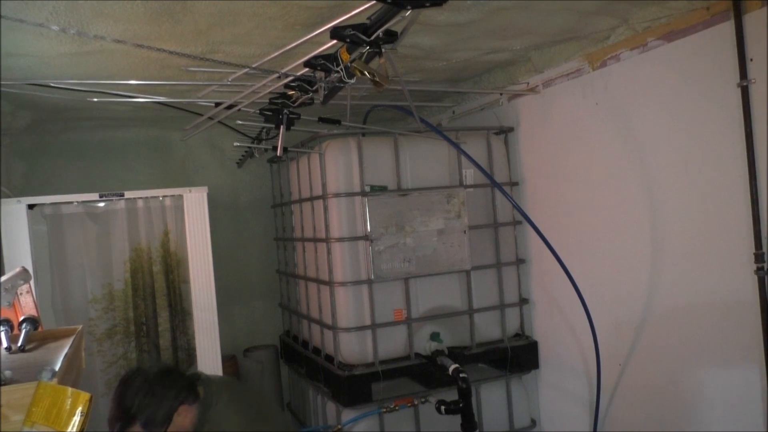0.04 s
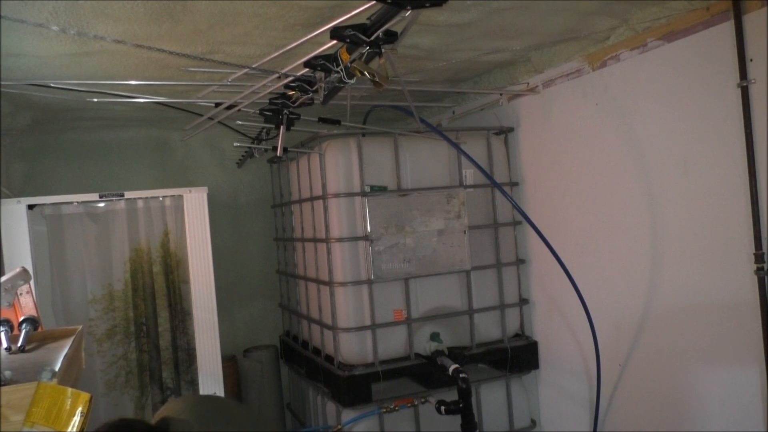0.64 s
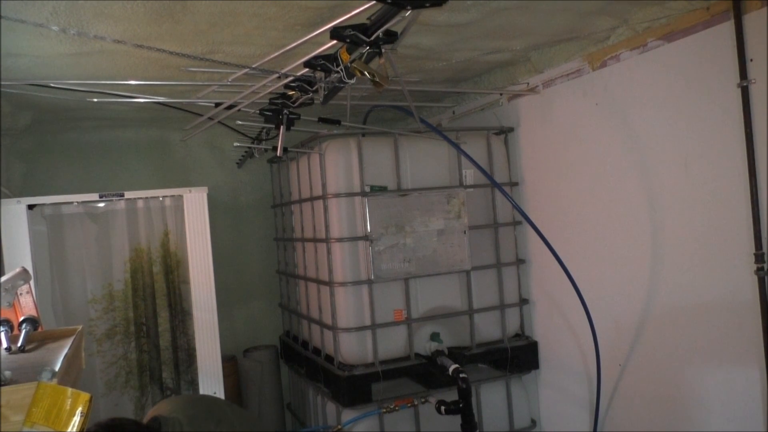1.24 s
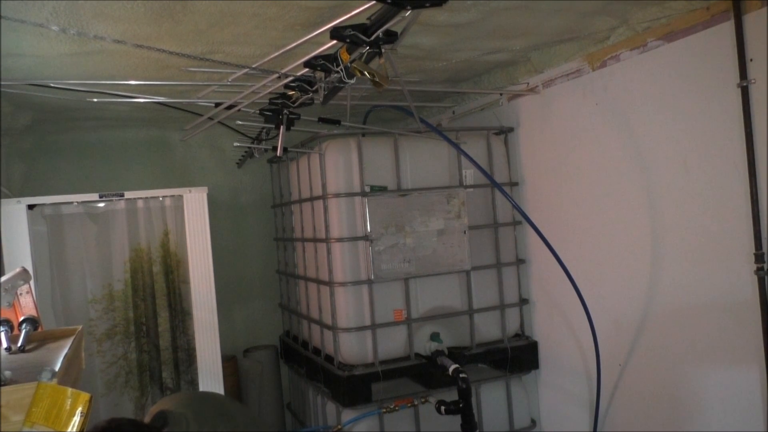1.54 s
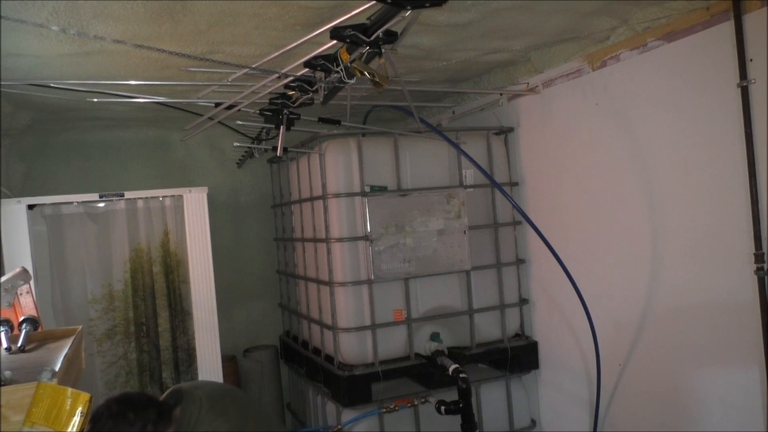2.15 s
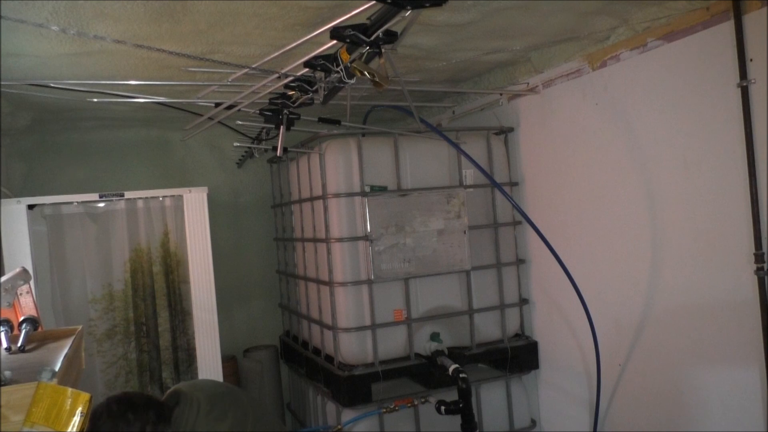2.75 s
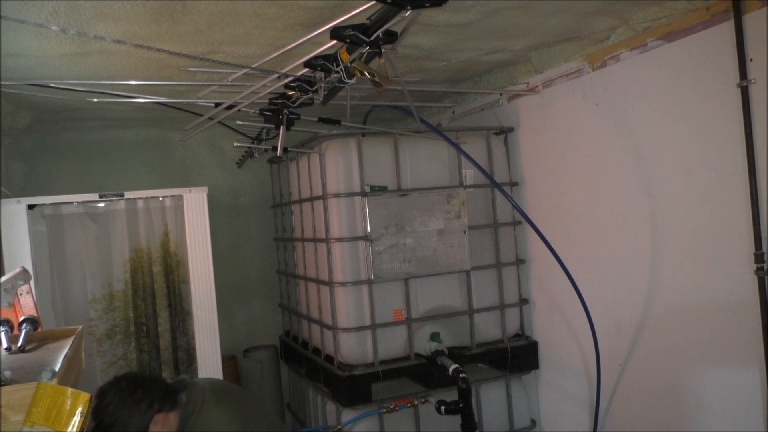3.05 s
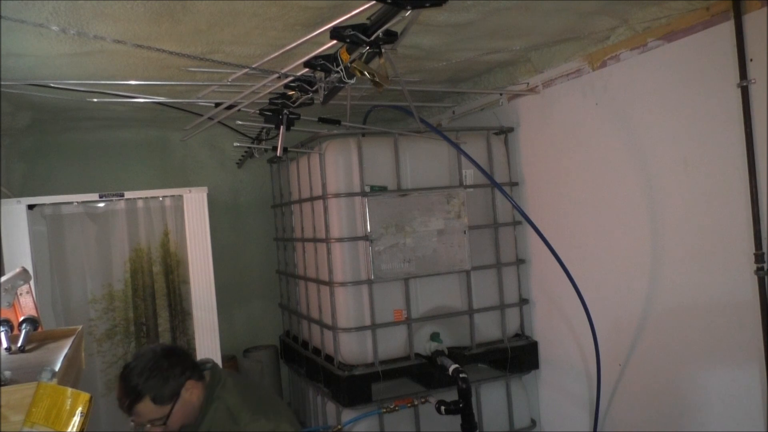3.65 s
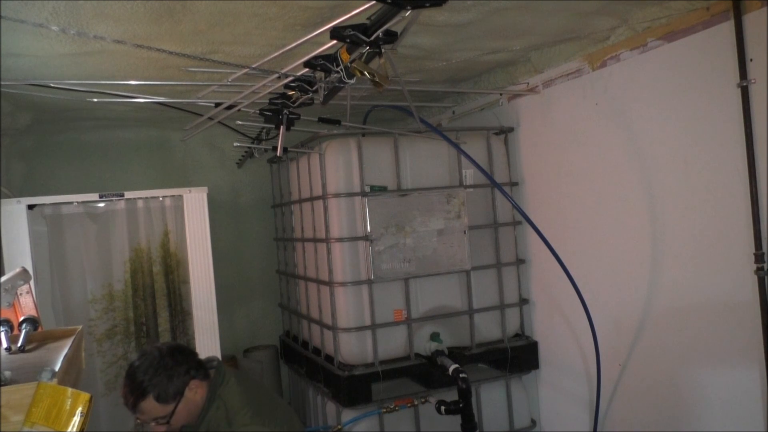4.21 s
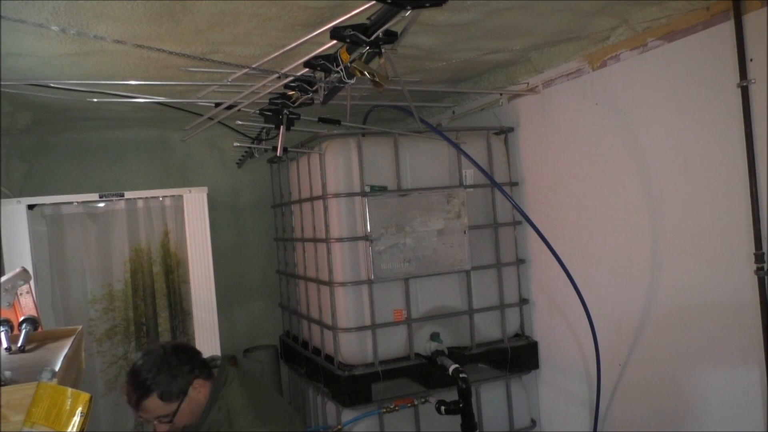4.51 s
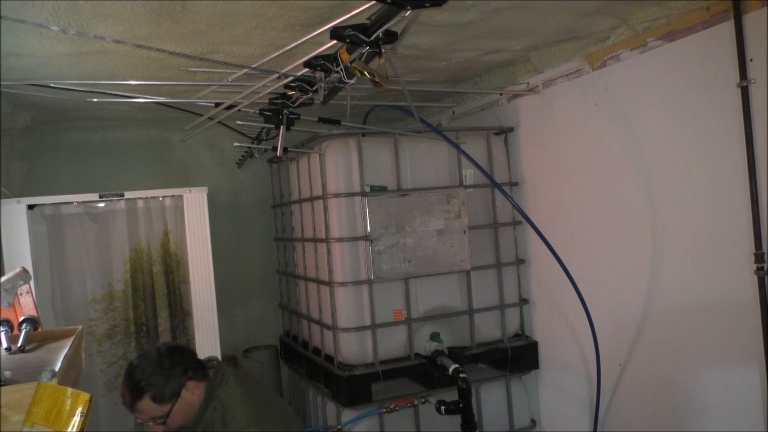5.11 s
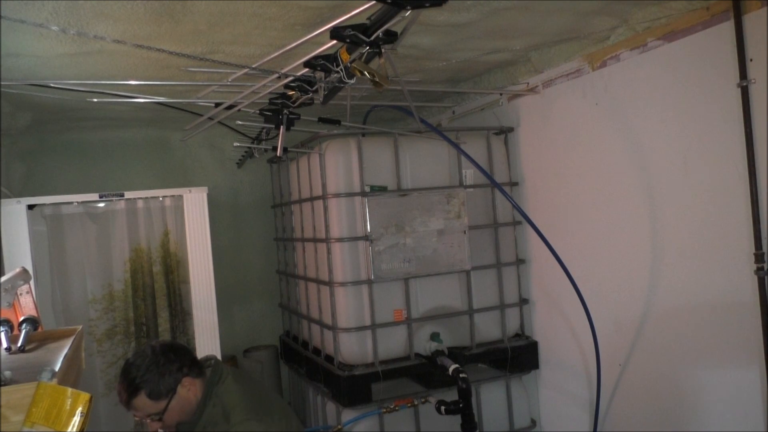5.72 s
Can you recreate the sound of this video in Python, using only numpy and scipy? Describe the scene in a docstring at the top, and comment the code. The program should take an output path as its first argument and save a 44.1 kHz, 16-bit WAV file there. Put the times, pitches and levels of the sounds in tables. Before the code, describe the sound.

Someone shifts a hollow plastic container in a small, hard-walled room. Jacket swishes and sliding lead into a run of hollow knocks and low thumps on the floor. Midway, a stiff plastic piece snaps and clatters. Lighter taps and scuffs follow, and an object is set down with a clack near the end. The handling is heard slightly to the left, over a faint steady hum and whirr.

```python
"""Handling a plastic container

Someone crouches in a small, hard-walled room, shifting a hollow plastic container and household things.
Each knock or scuff rings the container's belly and thin walls and leaves a dry tick; the room rings on.
A stiff piece snaps, an object is set down, and weight thumps on the floor.
A jacket swishes and things slide between the knocks, over a faint steady whirr and hum."""
import sys
import numpy as np
from scipy import signal
from scipy.fft import rfft, irfft, next_fast_len
from scipy.io import wavfile
from scipy.ndimage import uniform_filter1d

SR = 44100
rng = np.random.default_rng(int(sys.argv[2]) if len(sys.argv) > 2 else 0)


def unload_audio(sound):
    """Save the sound as a 16-bit wav file, at the path given as the first command line argument."""
    columns = np.transpose(np.atleast_2d(sound))
    # keep every value between -1 and 1, then stretch to whole-number steps
    steps = np.round(np.clip(columns, -1, 1) * 32767)
    wavfile.write(sys.argv[1], SR, steps.astype(np.int16))


N = 258867
RING = int(.5 * SR)  # samples given to one contact and its echoes

# room tone EQ: freq_hz, gain_db
AIR_EQ = [(48, -43), (63, 15), (80, 2), (400, -5), (650, -15), (1000, -6), (1450, -3.5), (2100, -8.5),
          (5000, -19), (8300, -20.5), (10500, -15.5), (15500, -19)]
# the steady hum and whirr: pitch_hz, width_hz, level_db
DRONES = [(62, 11, -64.5), (1445, 290, -64.5)]
# reverb time of the room: freq_hz, t60_s
ROOM_DECAY = [(100, 1), (250, 1), (500, 0.59), (1200, 0.44), (2500, 0.58), (6000, 0.69), (10000, 0.46),
              (16000, 0.12)]
# stereo width, as EQ on the side signal: freq_hz, gain_db
SIDE_EQ = [(60, -14.5), (300, -12.5), (2000, -11), (4500, -6), (6500, -26), (14000, -42)]
# left minus right at full lean: freq_hz, difference_db
PAN_CURVE = [(60, -5), (130, -2.5), (250, 1.3), (2000, 2.9), (4200, 1.2), (7000, .3)]

# cloth brushing on cloth: freq_hz, gain_db
CLOTH_EQ = [(700, -52), (2000, 10.5), (3500, 6), (5000, 2.5), (12000, 3.5), (16000, -3.5)]
# sliding plastic: freq_hz, gain_db
SLIDE_EQ = [(70, -0.5), (220, -2.5), (440, -9.5), (1300, 5.5), (2000, 1), (3000, -13.5), (4200, -16),
            (9000, -34)]
# dull thud of the belly's crowded modes: freq_hz, gain_db
THUD_EQ = [(45, -41.5), (80, 5.5), (230, -3.5), (510, 6.5), (620, -14.5), (1500, -34)]
# bright crack of crowded modes in walls and stiff parts: freq_hz, gain_db
CRACK_EQ = [(300, -8), (1000, 6.5), (2000, 6), (2900, 5), (4200, -7), (6500, -8.5), (14000, -21)]
# dry tick at the point of contact: freq_hz, gain_db
TICK_EQ = [(1500, -49), (3200, 5), (4200, 6), (7000, 3.5), (8500, 2), (13000, -4.5), (16000, -10)]

# modes of the floor: pitch_hz, level_db, t60_s
FLOOR_MODES = [(82, 9.5, 0.3), (122.5, 11.5, 0.18), (177, 3, 0.091)]
# modes of the hollow belly: pitch_hz, level_db, t60_s
BELLY_MODES = [(164, -2.5, 0.089), (222.8, 6, 0.13), (266, 5, 0.065), (337, 0.5, 0.089), (363, 2.5, 0.2),
               (430, 9, 0.069), (481, 8.5, 0.11)]
# modes of the thin walls: pitch_hz, level_db, t60_s
WALL_MODES = [(692, 5.5, 0.071), (770, -1.5, 0.062), (1020, 7.5, 0.046), (1160, 4.5, 0.057),
              (1384, 5, 0.037), (1697, 0.5, 0.047), (1880, 5, 0.038), (2156, 9.5, 0.031), (2365, 9, 0.018),
              (2610, 10.5, 0.028), (3000, 4, 0.024), (3840, -0.5, .03)]
# modes of the object that is set down: pitch_hz, level_db, t60_s
OBJECT_MODES = [(1020, -6, 0.04), (1110, 3, 0.045), (1300, 4.5, 0.03), (1920, -12, 0.055),
                (2365, -6.5, 0.032)]
# modes of the stiff plastic piece: pitch_hz, level_db, t60_s
PIECE_MODES = [(1420, 7.5, 0.047), (1707, -2, 0.074), (2120, 1, 0.047), (2650, -3, 0.023), (3450, 4, 0.022)]

# arm moves that swish the jacket: start_s, peak_s, end_s, level_db
SWISH_CUES = [(-.03, .51, 0.72, -50), (1.17, 1.41, 1.64, -50), (1.52, 1.63, 1.715, -43.5),
              (1.72, 1.83, 2.06, -55), (2.15, 2.49, 2.81, -56), (2.76, 2.88, 3.95, -61),
              (3.45, 3.8, 4.165, -56), (4, 4.53, 4.6, -68), (5.3, 5.62, 6, -59.5)]
# the container is pushed along: start_s, peak_s, end_s, level_db
SLIDE_CUES = [(.35, .55, 0.78, -51), (.88, 1.04, 1.34, -53), (1.15, 1.37, 1.62, -48.5),
              (1.52, 1.64, 1.9, -42.5), (1.72, 2.1, 2.58, -49.5), (2.8, 2.98, 3.23, -44.5),
              (5.05, 5.7, 5.86, -55)]
# short scrapes and faint singing rubs: start_s, end_s, pitch_hz, width_hz, level_db
RUB_CUES = [(0.32, 0.39, 1340, 400, -50), (1.352, 1.44, 1980, 1290, -46), (2.17, 2.67, 1440, 141, -54.5),
            (3.89, 4.455, 1975, 80, -60)]
# weight comes down on the floor: start_s, level_db
THUMP_CUES = [(1.717, -37), (1.757, -43), (2.636, -45), (2.681, -50), (2.743, -39), (2.982, -47),
              (5.238, -43.5)]
# light taps on a thin wall: start_s, contact_s, level_db
TAP_CUES = [(3.292, 0.0071, -50.5), (3.526, 0.018, -45), (4.152, 0.0041, -49), (4.486, .035, -53),
            (4.771, .0086, -59), (5.064, .0066, -57), (5.527, 0.013, -48.5)]
# soft scuffs of gripping and shifting: start_s, contact_s, belly_db, belly_hz, wall_db, wall_hz
SCUFF_CUES = [(.125, 0.011, -48, 278, -54.5, 1490), (.505, 0.044, -44.5, 208, -45, 2220),
              (.716, 0.044, -53, 280, -48, 2920), (0.861, .02, -39.5, 254, -44, 1670),
              (.882, 0.014, -48, 245, -44, 1020), (1.007, 0.02, -46, 346, -62, 1500),
              (1.062, 0.015, -44.5, 343, -46, 1790), (1.511, .012, -39, 406, -41.5, 1510),
              (1.584, 0.042, -39, 276, -41.5, 1630), (1.701, 0.011, -39.5, 300, -41, 1050),
              (1.755, 0.027, -37, 314, -46, 1400), (1.963, 0.0083, -49, 437, -42.5, 1350),
              (2.117, 0.017, -43.5, 232, -68, 1820), (2.277, 0.023, -47.5, 194, -64.5, 1780),
              (2.633, .018, -32.5, 459, -33.5, 1440), (3.135, 0.013, -41, 280, -41.5, 1470),
              (4.84, 0.014, -58, 336, -63, 900), (5.604, .012, -51, 330, -50.5, 1580),
              (5.664, 0.014, -46.5, 304, -49, 1135)]
# an object lands, one edge and then the other: start_s, contact_s, belly_db, ring_db, tick_db
SET_DOWN_CUES = [(5.2155, 0.0037, -43.5, -40, -53), (5.2216, 0.0061, -50.5, -36, -56.5)]
# the stiff piece clatters against the container: start_s, contact_s, belly_db, ring_db, tick_db
SNAP_CUES = [(2.767, 0.0032, -33, -27, -28), (2.87, 0.0065, -40, -33.5, -33.5),
             (2.897, 0.0044, -45, -35.5, -39.5), (2.9593, 0.0019, -46, -36, -36.5)]
# firm knocks on the container:
# start_s, contact_s, belly_db, belly_hz, damping_s, wall_db, wall_hz, tick_db, tick_top_hz
KNOCK_CUES = [(1.093, 0.0028, -26.5, 338, 0.13, -25.5, 1990, -37, 6150),
              (1.197, 0.0039, -25.5, 378, 0.03, -31.5, 1880, -39.5, 14000),
              (1.212, 0.0046, -26.5, 334, 0.14, -37.5, 930, -47, 14000),
              (1.565, 0.011, -34.5, 363, 0.15, -37, 1710, -46.5, 9000),
              (1.7157, 0.0049, -26, 242, .16, -25.5, 1430, -31.5, 13700),
              (2.007, 0.007, -28, 234, 0.26, -31, 1740, -46, 4230),
              (2.679, 0.0073, -27, 460, .06, -24.5, 1200, -30.5, 4830),
              (2.699, 0.0047, -30.5, 262, 0.066, -31, 780, -43, 4500),
              (2.734, 0.0082, -33, 236, 0.049, -34, 2680, -42, 5000)]


def undb(db):
    """Decibels to gain."""
    return 10 ** (np.asarray(db) / 20)


def unit(x):
    """Scale to rms 1."""
    return x / np.sqrt(np.mean(x ** 2) + 1e-20)


def along(points, hz):
    """Read (freq_hz, value) points on a log-frequency axis."""
    freqs, values = np.transpose(points)
    return np.interp(np.log(hz + 1), np.log(freqs), values)


def eq(x, points):
    """Causal EQ through (freq_hz, gain_db) points, built from the curve's cepstrum."""
    size = 2 * next_fast_len(x.shape[-1] // 2 + 2048)
    gain = undb(along(points, np.arange(size // 2 + 1) * SR / size))
    cepstrum = irfft(np.log(gain))
    cepstrum[1:size // 2] *= 2
    cepstrum[size // 2 + 1:] = 0
    return irfft(rfft(x, size) * np.exp(rfft(cepstrum)))[..., :x.shape[-1]]


def drift(rate_hz):
    """A slow random wander of rms 1."""
    hold = int(SR / rate_hz)
    steps = np.repeat(rng.standard_normal(N // hold + 1), hold)
    return unit(uniform_filter1d(steps, hold)[:N])


def grains(size, spread_db):
    """Friction grit: dense micro-slips of uneven strength."""
    noise = rng.standard_normal(size)
    strength = np.repeat(rng.standard_normal(size // 32 + 1), 32)[:size]
    return unit(noise * undb(spread_db * strength))


def resonance(hz, width_hz):
    """Mid and side noise ringing in one resonance."""
    return unit(signal.lfilter(*signal.iirpeak(hz, hz / width_hz, fs=SR), rng.standard_normal((2, N))))


def ring(modes, detune):
    """Decaying modes; where the blow lands sets each one's sign and size."""
    hz, db, t60 = np.transpose(modes)[:, :, None]
    t = np.arange(RING // 2) / SR
    sign, size, shift = rng.standard_normal((3, len(modes), 1))
    gain = np.sign(sign) * undb(db + 2 * size)
    tones = np.sin(2 * np.pi * hz * (1 + detune * shift) * t)
    return np.sum(gain * tones * np.exp(-np.log(1000) * t / t60), axis=0)


def reverb_tail():
    """The room's diffuse decay, unrelated in mid and side; the top treble dies first."""
    t = np.arange(RING) / SR
    hz = np.arange(RING // 2 + 1) * SR / RING
    noise = rfft(rng.standard_normal((2, RING)))
    centres_hz, t60s = np.transpose(ROOM_DECAY)
    tail = 0
    for solo, t60 in zip(np.eye(len(t60s)), t60s):
        band = along(np.c_[centres_hz, solo], hz)
        tail = tail + irfft(noise * band, RING) * np.exp(-np.log(1000) * t / t60)
    return unit(tail)


def room(tail, tail_db=-6.5, early_db=-20.0, early_s=0.04):
    """Mid and side response: direct sound, close reflections from floor and walls, diffuse tail."""
    early = rng.standard_normal((2, RING)) * np.exp(-np.arange(RING) / SR / early_s)
    response = (undb(tail_db) * tail + undb(early_db) * unit(early)) / np.sqrt(RING)
    response[0, 0] += 1
    return response


def convolve(x, response):
    """Play a sound through a mid and side response, keeping the longer one's length."""
    return signal.fftconvolve(x[None], response, axes=-1)[:, :max(len(x), response.shape[-1])]


def place(out, sound, start_s, contact_s, db):
    """Drop a hit on the timeline, with its level set over the attack."""
    start, attack = int(start_s * SR), int((contact_s + .02) * SR)
    out[:, start:start + RING] += sound * undb(db) / np.sqrt(np.mean(sound[0, :attack] ** 2))


def stereo(sound, lean):
    """Mid and side become left and right, panned by a share of the pan curve."""
    mid, side = sound[0], eq(sound[1], SIDE_EQ)
    return np.array([eq(mid + sign * side, [(hz, sign * lean * db / 2) for hz, db in PAN_CURVE])
                     for sign in (1, -1)])


def room_tone(air_db=-55.5):
    """Steady room air with a low hum and a narrow whirr, as of a small fan."""
    air = unit(eq(rng.standard_normal((2, N)), AIR_EQ)) * undb(air_db + .5 * drift(2.296))
    return air + sum(undb(db) * resonance(hz, width_hz) for hz, width_hz, db in DRONES)


def strokes(cues, sharpness=1.11):
    """Envelope of strokes that gather speed, round their peak and come to rest; their powers add."""
    t = np.arange(N) / SR
    power = 0
    for start_s, peak_s, end_s, db in cues:
        speed = np.sin(np.pi / 2 * np.interp(t, [start_s, peak_s, end_s], [0, 1, 0]))
        power = power + (undb(db) * speed ** sharpness) ** 2
    return np.sqrt(power)


def jacket_and_slides(cloth_db=0.5, slide_db=-2.5, rumble_db=-1.5, rest_db=-84, drag_db=-4.5):
    """Cloth brushes on cloth; plastic slides in fits and starts and, pressed harder, rumbles."""
    swish = np.hypot(strokes(SWISH_CUES), undb(rest_db))  # the jacket is never quite still
    push = np.hypot(strokes(SLIDE_CUES), undb(drag_db) * swish)  # each arm move drags a little too
    space = room(reverb_tail())
    brushing = grains(N, 1.1) * undb(1.3 * drift(35))
    cloth = unit(convolve(eq(brushing, CLOTH_EQ), space))
    slips = grains(N, 3.2) * undb(2.6 * drift(30))
    slide = unit(convolve(eq(slips, SLIDE_EQ), space))
    rumble = unit(convolve(signal.fftconvolve(slips, ring(BELLY_MODES, detune=0))[:N], space))
    grip = push / (push + undb(-51.0))
    plastic = undb(slide_db) * slide + undb(rumble_db) * grip * rumble
    return undb(cloth_db) * swish * cloth + push * plastic


def rubs():
    """A scrape or rub feeds one resonance, swelling and fading with the stroke."""
    t = np.arange(N) / SR
    out = np.zeros((2, N))
    for start_s, end_s, hz, width_hz, db in RUB_CUES:
        swell = np.sin(np.pi * np.clip((t - start_s) / (end_s - start_s), 0, 1))
        out += undb(db) * resonance(hz, width_hz) * swell
    return out


def contact(contact_s, tail, tail_db, early_db, early_s=0.023, chatter_db=3.0):
    """A burst of micro-slips, abrupt for a knock and swelling for a scuff, with mid and side echoes."""
    age = np.arange(RING) / SR / contact_s
    force = unit(age * np.exp(-1.3 * age ** 2))
    # close reflections hold the energy a moment; the diffuse tail builds up as the contact feeds it
    held = np.sqrt(signal.lfilter([1], [1, -np.exp(-2 / (early_s * SR))], force ** 2 + 1e-18))
    early = unit(held) * np.array([grains(RING, chatter_db) for _ in range(2)])
    late = unit(tail * np.sqrt(np.cumsum(force ** 2)))
    burst = undb(early_db) * early + undb(tail_db) * late
    burst[0] += force * grains(RING, chatter_db)
    return burst


def body(burst, modes, dense_eq, dense_db=0.0, detune=.012):
    """A struck part: a few clear modes, detuned as it flexes, over many crowded, heavily damped ones."""
    return unit(convolve(ring(modes, detune), burst)) + undb(dense_db) * unit(eq(burst, dense_eq))


def focus(hz, db_per_octave):
    """A broad EQ hump: the place and hardness of the blow favour modes near one pitch."""
    return [(hz / 4, -2 * db_per_octave), (hz, 0), (hz * 4, -2 * db_per_octave)]


def belly(contact_s, tail, hz, damping_s=0.16):
    """The container's hollow thud: the struck spot favours one pitch, and the holding hand damps it."""
    hump = [(hz / 4, -14.0), (hz / 1.2, 0), (hz * 1.2, 0), (hz * 2.2, -11.0)]
    since_contact = np.maximum(np.arange(RING) / SR - 2 * contact_s, 0)
    thud = body(contact(contact_s, tail, tail_db=-5.0, early_db=-2.0), BELLY_MODES, THUD_EQ)
    return eq(thud, hump) * np.exp(-since_contact / damping_s)


def walls(contact_s, tail, hz, hardness_db, db_per_octave=6.5):
    """The crunchy clack of the thin walls; a soft contact cracks less and rings more purely."""
    burst = contact(contact_s, tail, tail_db=-5.0, early_db=-2.5, chatter_db=4.5)
    crack_db = 1.5 + 0.17 * min(hardness_db, 0)
    return eq(body(burst, WALL_MODES, CRACK_EQ, crack_db), focus(hz, db_per_octave))


def tick(contact_s, tail, top_hz=6400, tail_db=1.0, early_db=5.5):
    """The dry tick at the point of contact; a blunter edge ends its treble lower."""
    shelf = [(top_hz, 0), (top_hz * 1.4, -8.5)]
    return eq(eq(contact(contact_s, tail, tail_db, early_db), TICK_EQ), shelf)


def thumps(contact_s=0.0047):
    """The floor answers a heavy contact with a short, deep thump."""
    out = np.zeros((2, N + RING))
    low_cut = signal.butter(2, FLOOR_MODES[0][0], "high", fs=SR, output="sos")  # at the lowest mode
    for start_s, db in THUMP_CUES:
        push = contact(contact_s, reverb_tail(), tail_db=-15.5, early_db=-30.0)
        thump = convolve(ring(FLOOR_MODES, detune=0.063), push)
        place(out, signal.sosfilt(low_cut, thump), start_s, contact_s, db)
    return out[:, :N]


def taps(wall_hz=1470, hardness_db=-11.5):
    """Touches that stir a thin wall and tick, too light to move the belly."""
    out = np.zeros((2, N + RING))
    for start_s, contact_s, db in TAP_CUES:
        tail = reverb_tail()
        clack = walls(contact_s, tail, wall_hz, hardness_db, db_per_octave=11.5)
        place(out, clack, start_s, contact_s, db)
        place(out, tick(contact_s, tail), start_s, contact_s, db + hardness_db)
    return out[:, :N]


def scuffs(hardness_db=-12):
    """Slow, soft contacts: belly and walls, with little tick."""
    out = np.zeros((2, N + RING))
    for start_s, contact_s, belly_db, belly_hz, wall_db, wall_hz in SCUFF_CUES:
        tail = reverb_tail()
        place(out, belly(contact_s, tail, belly_hz), start_s, contact_s, belly_db)
        place(out, walls(contact_s, tail, wall_hz, hardness_db), start_s, contact_s, wall_db)
        place(out, tick(contact_s, tail), start_s, contact_s, wall_db + hardness_db)
    return out[:, :N]


def set_down(belly_hz=250.0, clack_hz=1680.0):
    """A stiffer object lands with a ringing double clack and stirs the container beneath it."""
    out, tail = np.zeros((2, N + RING)), reverb_tail()
    for start_s, contact_s, belly_db, ring_db, tick_db in SET_DOWN_CUES:
        burst = contact(contact_s, tail, tail_db=-6.5, early_db=-4.5)
        clack = body(burst, OBJECT_MODES, CRACK_EQ, dense_db=-4.0)
        place(out, belly(contact_s, tail, belly_hz), start_s, contact_s, belly_db)
        place(out, eq(clack, focus(clack_hz, db_per_octave=5.0)), start_s, contact_s, ring_db)
        place(out, tick(contact_s, tail), start_s, contact_s, tick_db)
    return out[:, :N]


def snaps(belly_hz=308.0, top_hz=11200.0):
    """The stiff piece cracks sharply, rings its own bright notes and nudges the belly."""
    out = np.zeros((2, N + RING))
    for start_s, contact_s, belly_db, ring_db, tick_db in SNAP_CUES:
        tail = reverb_tail()
        clack = body(contact(contact_s, tail, tail_db=-6.0, early_db=1.0), PIECE_MODES, CRACK_EQ)
        place(out, belly(contact_s, tail, belly_hz), start_s, contact_s, belly_db)
        place(out, clack, start_s, contact_s, ring_db)
        place(out, tick(contact_s, tail, top_hz, tail_db=-4.0, early_db=1.0), start_s, contact_s, tick_db)
    return out[:, :N]


def knocks():
    """Each firm knock layers belly, walls and tick; each lands on a new spot, so its echoes differ."""
    out = np.zeros((2, N + RING))
    for start_s, contact_s, belly_db, belly_hz, damping_s, wall_db, wall_hz, tick_db, top_hz in KNOCK_CUES:
        tail = reverb_tail()
        place(out, belly(contact_s, tail, belly_hz, damping_s), start_s, contact_s, belly_db)
        place(out, walls(contact_s, tail, wall_hz, tick_db - wall_db), start_s, contact_s, wall_db)
        place(out, tick(contact_s, tail, top_hz), start_s, contact_s, tick_db)
    return out[:, :N]


def scene():
    """The handling sits a little to the left; the room tone is nearer the middle."""
    hits = knocks() + snaps() + thumps() + scuffs() + taps() + set_down()
    handling = hits + jacket_and_slides() + rubs()
    return stereo(handling, lean=0.78) + stereo(room_tone(), lean=0.41)


def record(dry, low_hz=52.6, top_hz=15850):
    """Master EQ: thin the deep bass and cut the very top."""
    thinned = signal.sosfilt(signal.butter(2, low_hz, "high", fs=SR, output="sos"), dry)
    return signal.sosfilt(signal.ellip(10, .2, 80, top_hz, fs=SR, output="sos"), thinned)


dry = scene()
out = record(dry)
unload_audio(out)
```